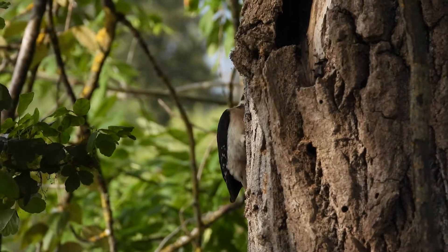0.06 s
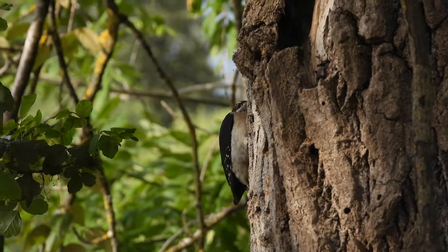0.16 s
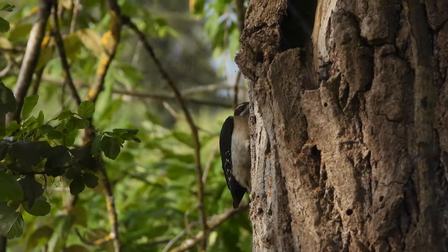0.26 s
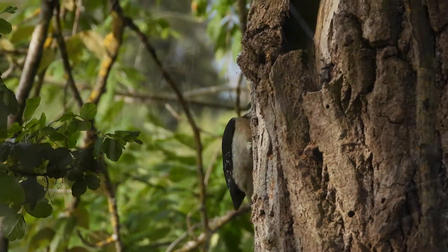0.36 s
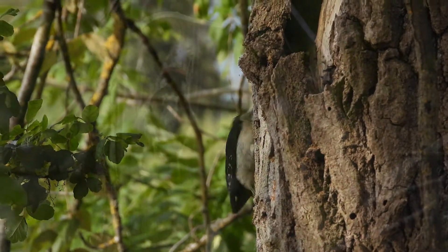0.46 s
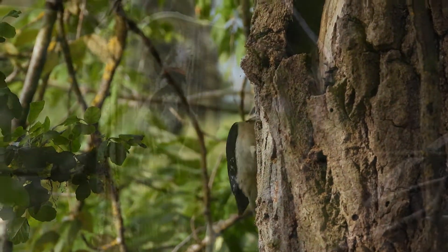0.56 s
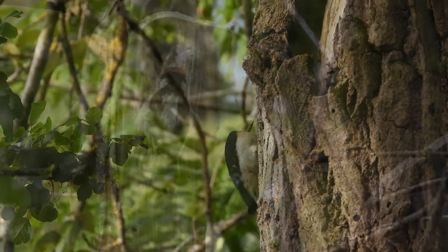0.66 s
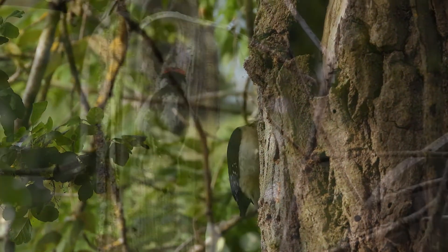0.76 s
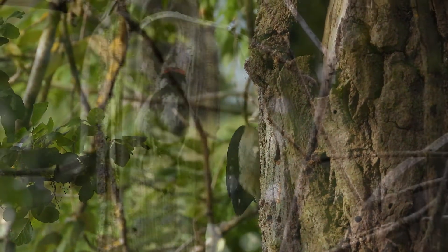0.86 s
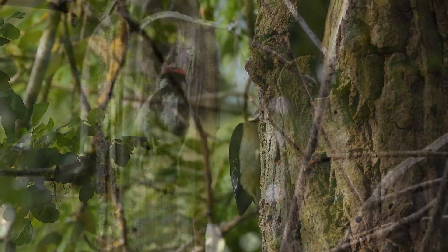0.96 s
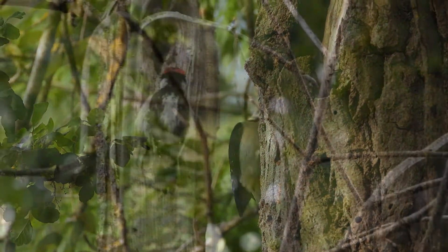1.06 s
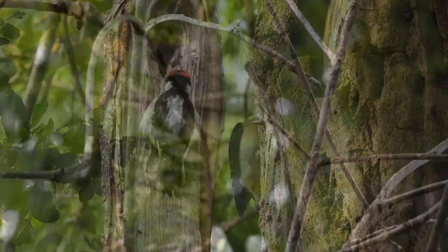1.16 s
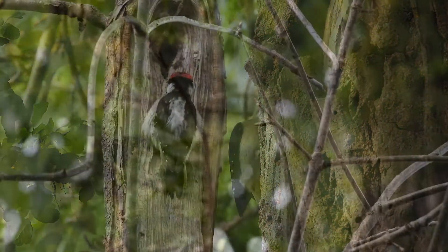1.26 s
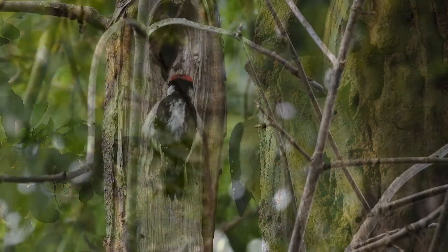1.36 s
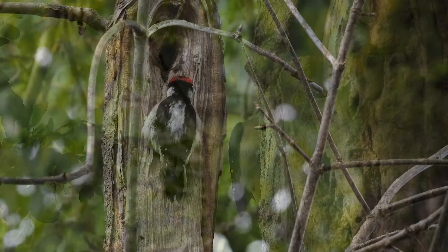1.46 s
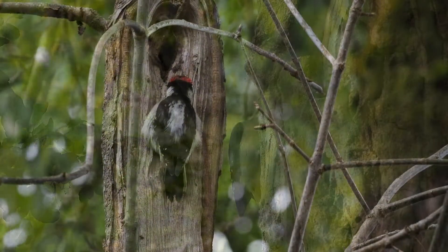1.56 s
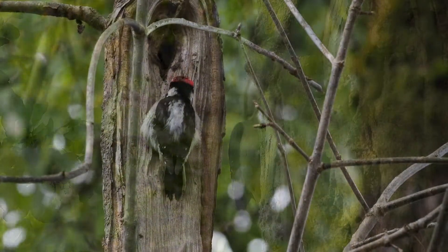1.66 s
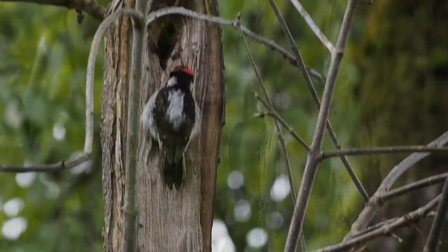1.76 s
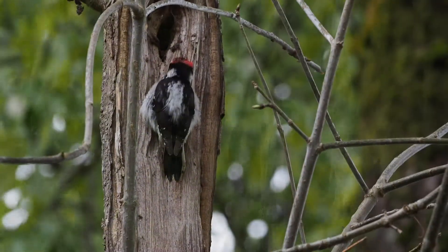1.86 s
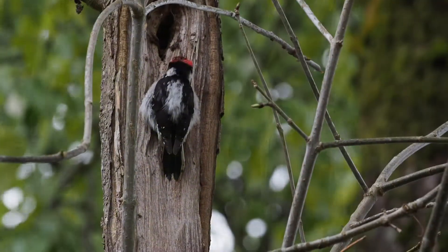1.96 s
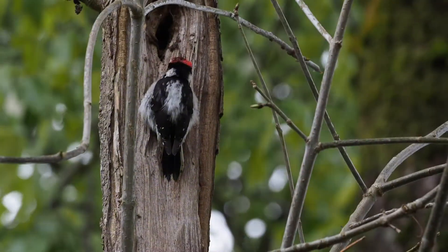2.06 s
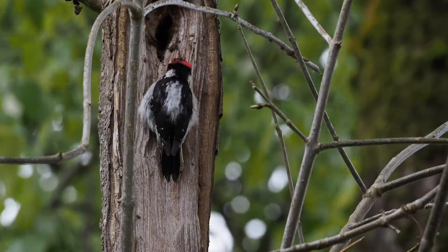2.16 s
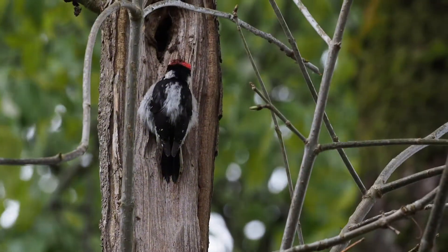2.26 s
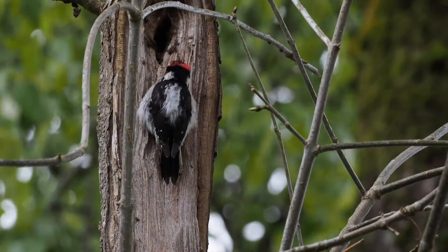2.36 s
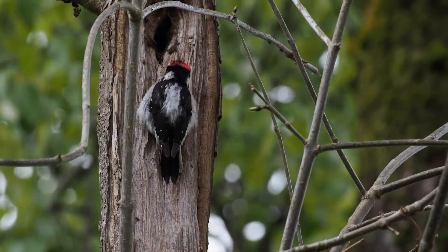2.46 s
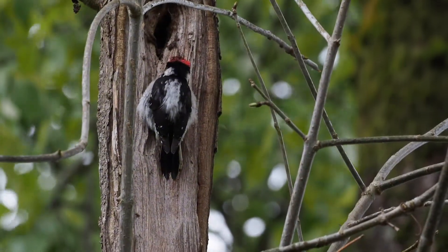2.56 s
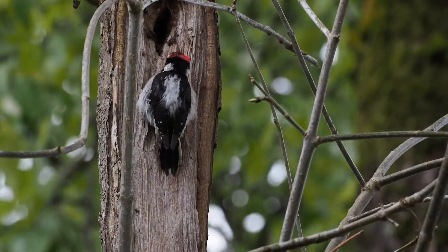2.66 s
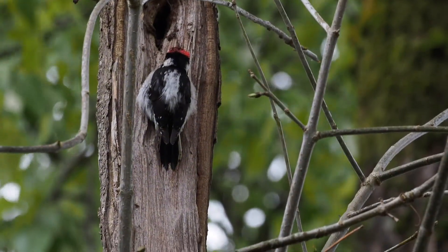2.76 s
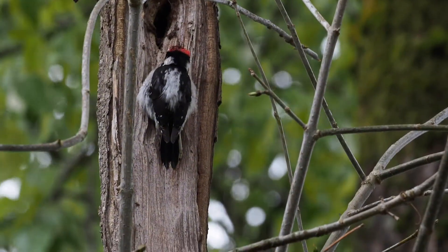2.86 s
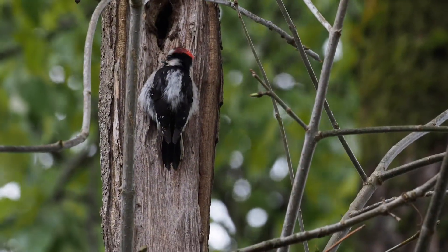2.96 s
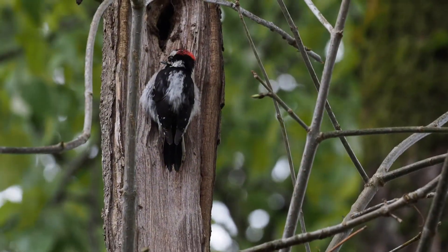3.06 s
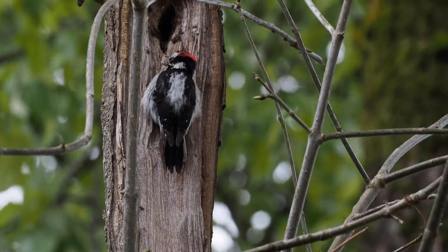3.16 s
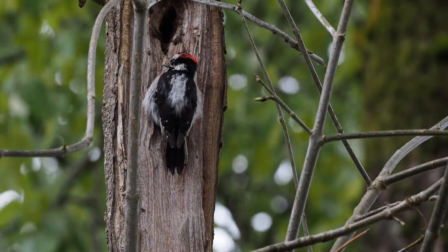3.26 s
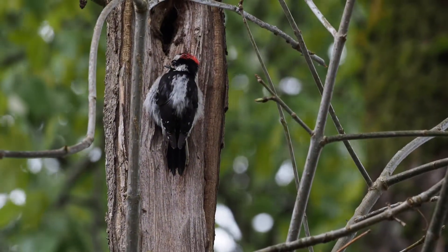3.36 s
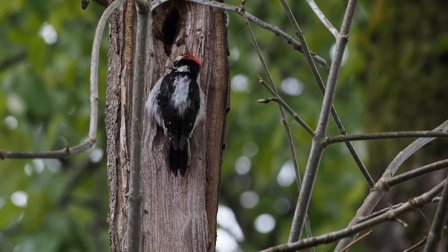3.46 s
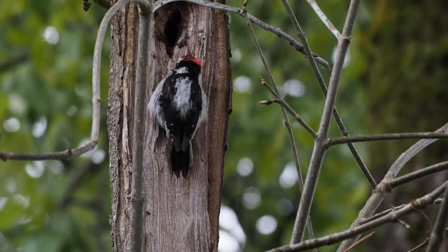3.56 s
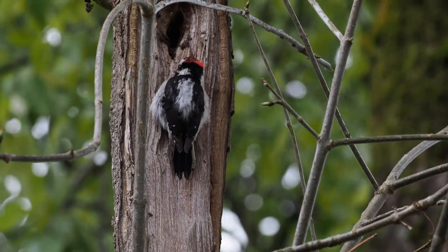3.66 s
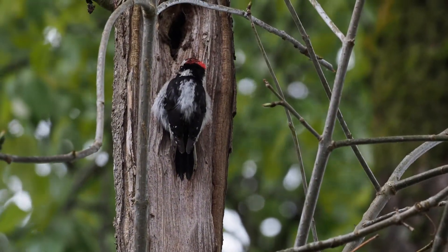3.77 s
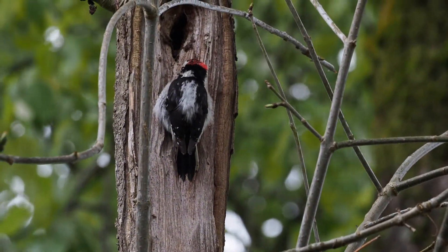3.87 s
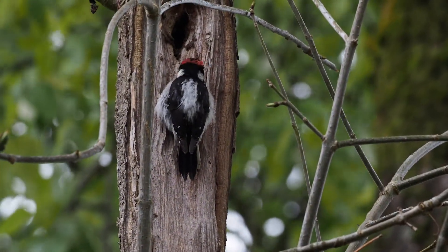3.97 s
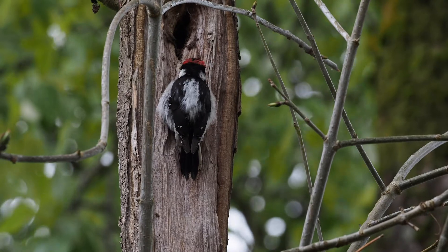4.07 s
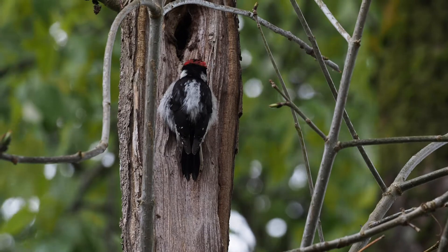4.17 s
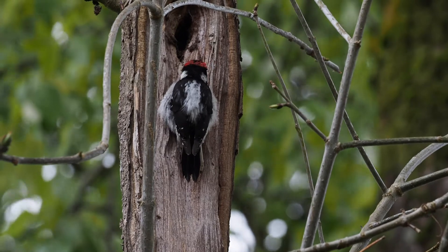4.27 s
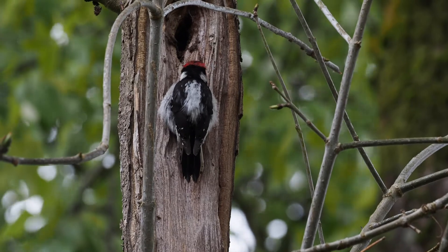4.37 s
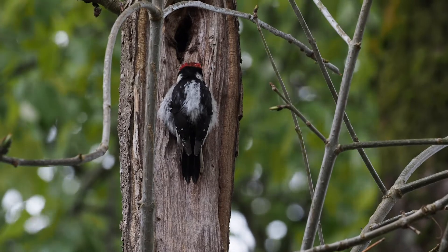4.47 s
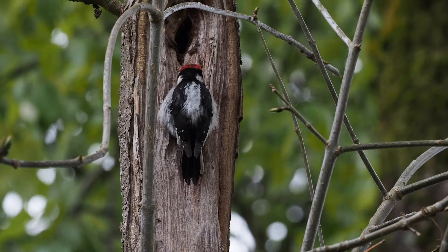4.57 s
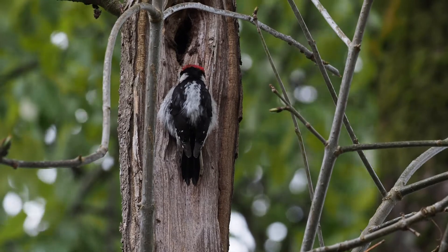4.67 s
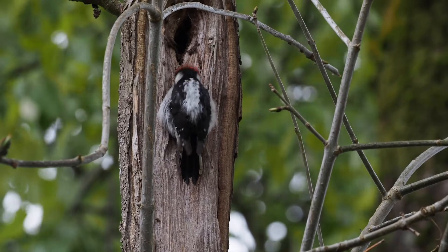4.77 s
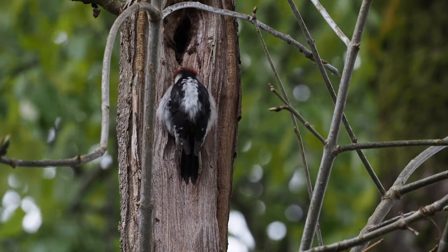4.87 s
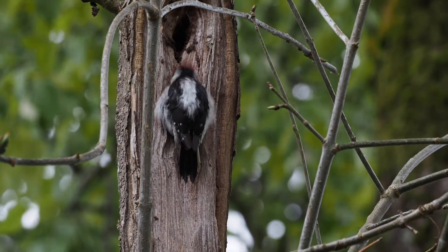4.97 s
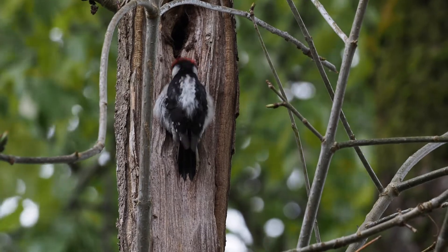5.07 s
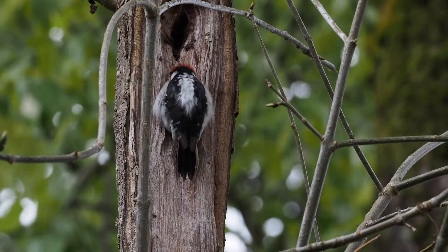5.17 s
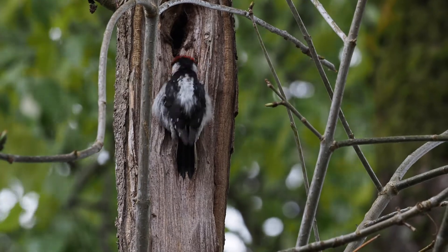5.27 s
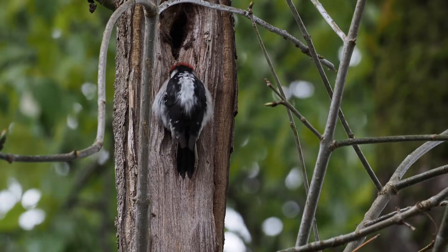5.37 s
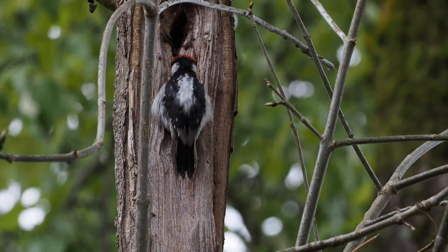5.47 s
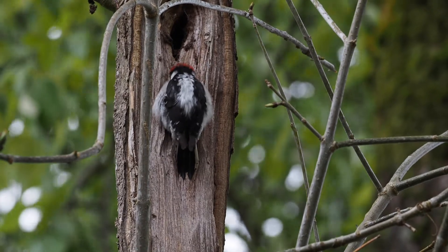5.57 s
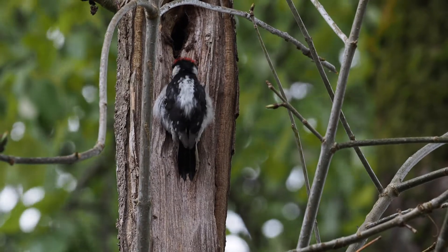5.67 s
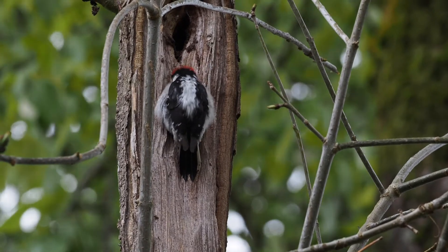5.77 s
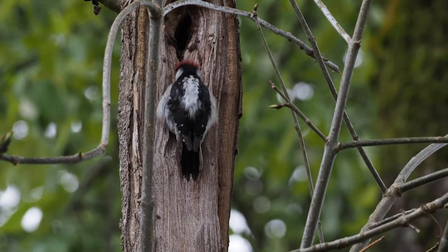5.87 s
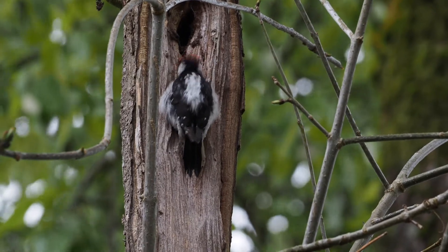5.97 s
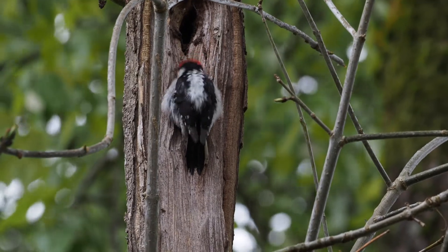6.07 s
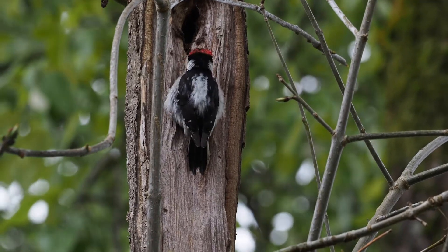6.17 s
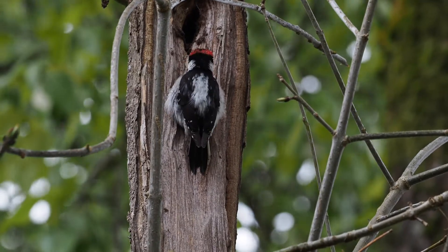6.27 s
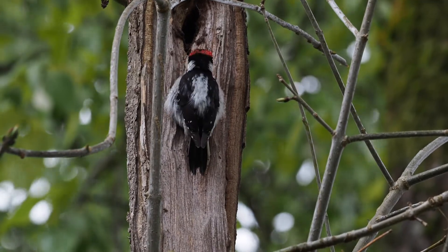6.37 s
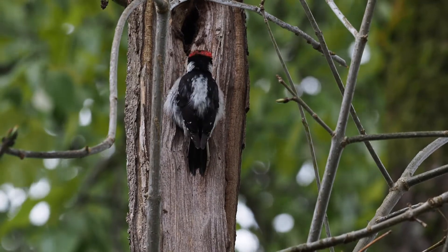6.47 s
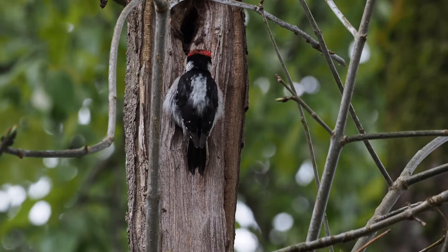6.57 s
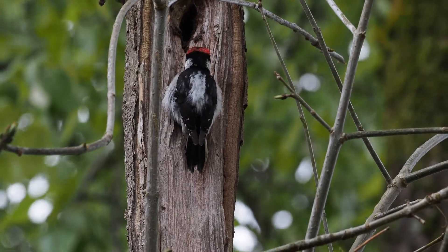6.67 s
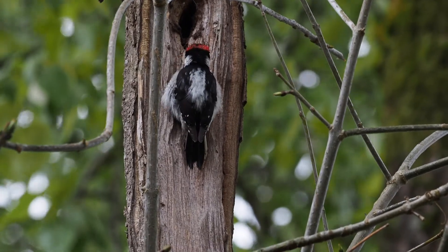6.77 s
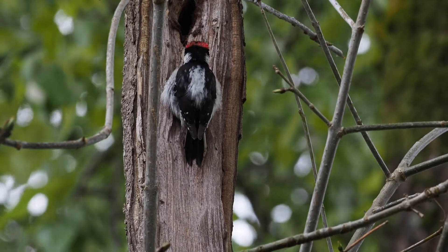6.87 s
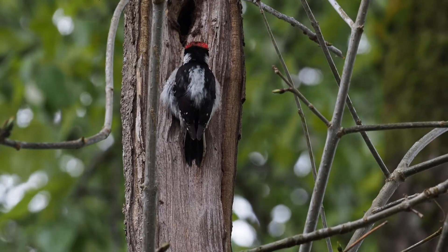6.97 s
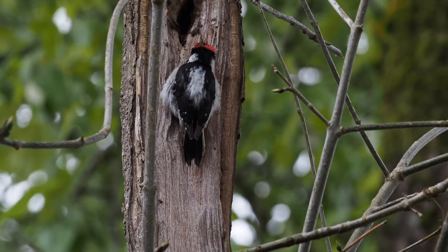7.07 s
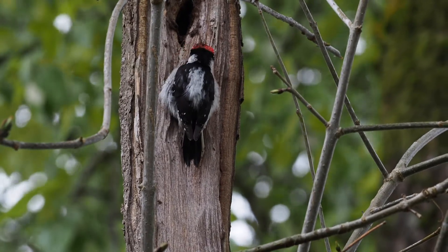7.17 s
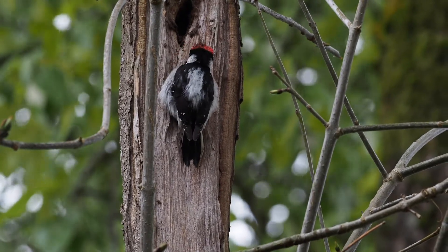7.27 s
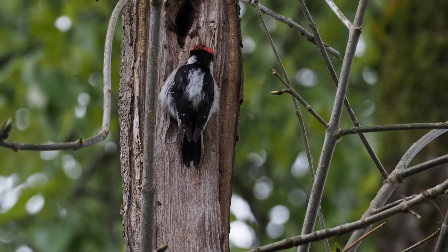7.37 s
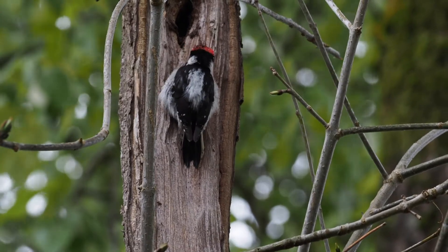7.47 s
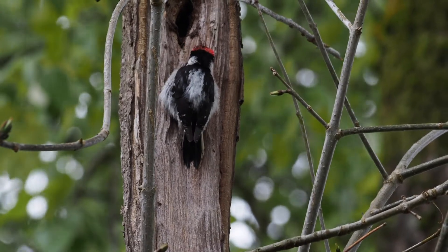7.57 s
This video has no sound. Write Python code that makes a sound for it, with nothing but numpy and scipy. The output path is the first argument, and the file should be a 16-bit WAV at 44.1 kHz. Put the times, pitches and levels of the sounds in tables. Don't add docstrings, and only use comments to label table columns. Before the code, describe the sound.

A hushed grove with a small croak, evenly spaced chips and two soft pecks fades to a brief silence. A fuller forest starts abruptly: leaf hiss, low distant traffic and a warbler whistling quickly on the left. Then a woodpecker drums one loud, hollow roll of about twenty blows, slowing slightly, with echoes from surrounding trees. Small birds carry on afterwards. Stereo, outdoors, drumming clear and dominant.

```python
import sys
import numpy as np
from scipy import signal
from scipy.fft import rfft, irfft, next_fast_len
from scipy.io import wavfile
from scipy.ndimage import uniform_filter1d, map_coordinates

SR = 44100
rng = np.random.default_rng(int(sys.argv[2]) if len(sys.argv) > 2 else 0)


def master(y):
    cut = np.clip(np.atleast_2d(y).T, -1, 1)
    pcm = np.round(cut * 32767)
    wavfile.write(sys.argv[1], SR, pcm.astype(np.int16))


def volts(x):
    e = np.asarray(x, float) / 20
    return 10 ** e


N = 336483
GROVE_END_S, CUT_S = 1.068, 1.2315
SIDES = np.array([[.5], [-.5]])


def unit(x):
    return x / np.sqrt(np.mean(x ** 2) + 1e-20)


def along(points, hz):
    f, v = np.transpose(points)
    return np.interp(np.log(hz + 1), np.log(f + 1), v)


def curves(rows):
    s, *columns = np.transpose(rows)
    return [np.interp(np.arange(N) / SR, s, column) for column in columns]


def wobble(rate):
    knots = rng.standard_normal(int(N * rate / SR) + 4)
    return map_coordinates(knots, [np.arange(N) * rate / SR])


def add(mix, s, sound):
    part = mix[:, round(s * SR):][:, :sound.shape[1]]
    part += sound[:, :part.shape[1]]


def late_left(x, count):
    return np.array([np.roll(x[0], count), x[1]])


def reverb(x, alike, size_share=1):
    # (frequency [Hz], time to fall by 60 dB [s])
    wood = [(300, 0.19), (1000, 0.93), (3000, 1), (8000, 0.545)]
    hz, t, z = signal.stft(rng.standard_normal((2, SR)), SR, nperseg=256)
    z = z / np.abs(z + 1e-9) ** .7
    t60 = size_share * along(wood, hz)[:, None]
    a, b = signal.istft(z * volts(-60 * t / t60), SR, nperseg=256)[1]
    tail = np.array([a + alike * b, b + alike * a])
    late = np.pad(x, ((0, 0), (400, 0)))
    return signal.fftconvolve(late, tail / np.linalg.norm(tail[0]), axes=1)[:, :N]


def ring(modes, t, attack, scatter_db):
    total = 0
    for k, (hz, db, t60) in enumerate(modes):
        fading = volts(db + rng.normal(0, scatter_db) - 60 * t / t60)
        total = total + (-1) ** k * fading * np.sin(2 * np.pi * hz * t)
    return (1 - np.exp(-t / attack)) ** 2 * total


def drumming():
    # (time [s], peak level [dB])
    blows = [(4.796, -12.5), (4.855, -8), (4.912, -7), (4.97, -7), (5.03, -6.5), (5.09, -6.5),
             (5.151, -6.5), (5.214, -7), (5.278, -7), (5.344, -7.5), (5.412, -6.5), (5.479, -7.5),
             (5.546, -7), (5.613, -7), (5.678, -7), (5.744, -7.5), (5.815, -7.5), (5.885, -7.5),
             (5.963, -8), (6.037, -8), (6.122, -10)]
    # (frequency [Hz], level [dB], t60 [s])
    trunk = [(796, -14.5, .021), (991, 0, .02), (1091, -.1, .021)]
    # (frequency [Hz], level [dB], t60 [s])
    bending = [(1285, -12, 0.01111), (1530, -16, 0.01005)]
    # (frequency [Hz], level [dB], t60 [s])
    bark = [(576, -22, 0.025), (1973, -3.5, 0.00965), (2254, 1.5, 0.00846), (2445, -14, 0.01036),
            (2700, -12, 0.01566), (2941, -15.5, 0.01306), (3200, -12, 0.01002), (3500, -25, 0.0045)]
    # (frequency [Hz], level [dB], t60 [s])
    skin = [(3650, -18, 0.01297), (4160, -17.5, 0.0094), (4930, -21.5, 0.0057), (5500, -21.5, 0.0075),
            (6540, -26.5, 0.0036), (7480, -24.5, 0.0066)]
    # (delay [s], left level [dB], right level [dB])
    trees = [(.0085, -10.5, -14.5), (0.014, -20.5, -21.5), (0.024, -20, -18), (0.0387, -24, -20.5),
             (0.052, -33, -39), (0.076, -25, -27), (.110, -26, -26), (0.126, -32, -31.5),
             (.203, -27, -27.5), (0.277, -34, -35.5), (.362, -25, -24)]
    # (delay [s], level [dB])
    smooth_trunks = [(.011, -12.5), (.016, -17), (0.025, -15), (.032, -10.5), (.047, -20.5)]
    # (delay [s], level [dB])
    slim_delay, slim_db = (0.027, -8)

    boom, crack, snap, shoulder, late = np.zeros((5, 1, N))
    t = np.arange(SR // 8) / SR
    u = np.arange(round(.013 * SR)) / round(.013 * SR)
    slump_hz = 716.4 * (492.2 / 716.4) ** u
    slump = np.sin(np.pi * u) * np.sin(2 * np.pi * np.cumsum(slump_hz) / SR)
    splinter_band = signal.butter(2, [7800, 10800], "band", fs=SR, output="sos")
    usual_db = np.mean(blows, axis=0)[1]
    for s, db in blows:
        sharp_db = db - 14 + .2 * (db - usual_db) + .63 * rng.standard_normal()
        hollow = ring(trunk, t, attack=.004, scatter_db=.25)
        bends = ring(bending, t, attack=.00366, scatter_db=.37)
        dull = ring(bark, t, attack=.001892, scatter_db=1.13)
        bright = ring(skin, t, attack=.0004, scatter_db=2.18)
        add(boom, s - .0021, volts(db + 13) * hollow[None])
        add(late, s + .003253, volts(db - 25.5) * slump[None])
        add(shoulder, s - .0021, -volts(db + 13) * bends[None])
        add(crack, s - .0015, volts(sharp_db + 11) * dull[None])
        add(snap, s - .0007, volts(sharp_db) * bright[None])
        fibres = np.exp(-np.abs(t - .004) / .0014) * rng.standard_normal(len(t))
        add(snap, s - .0037, volts(db - 43.5) * signal.sosfilt(splinter_band, fibres)[None])

    boom = boom + shoulder
    sharp = crack + snap
    rough = boom + volts(-11) * sharp
    no_bass = signal.butter(2, 250, "high", fs=SR, output="sos")
    direct, answer = signal.sosfilt(no_bass, np.array([boom + sharp + late, rough]))
    short_waves = np.gradient(np.gradient(sharp, axis=1), axis=1)
    scattered = volts(-14.5) * boom + volts(-4) * shoulder + volts(12.5) * uniform_filter1d(short_waves, size=5)
    wet = direct * volts(SIDES * -1.6) + reverb(scattered, alike=.093)
    for delay, db in smooth_trunks:
        add(wet, delay, volts(db + 9.5) * np.gradient(crack, axis=1))
    add(wet, slim_delay, volts(slim_db) * shoulder)
    for delay, left_db, right_db in trees:
        add(wet, delay, answer * volts(np.array([[left_db], [right_db]])))
    return late_left(wet, count=1)


def glides(notes, flutter_db):
    out = np.zeros((2, N))
    for s, length, from_hz, to_hz, db, pan_db in notes:
        u = np.arange(round(length * SR)) / round(length * SR)
        way = u - .75 * np.sin(2 * np.pi * u) / (2 * np.pi)
        tone = np.sin(2 * np.pi * np.cumsum(from_hz * (to_hz / from_hz) ** way) / SR)
        add(out, s, volts(db + 3.5 + SIDES * pan_db) * np.sin(np.pi * u) ** .52 * tone)
    return out * volts(flutter_db * np.array([wobble(130), wobble(130)]))


def songs():
    # (time [s], from [Hz], to [Hz], level [dB])
    falls = [(1.225, 4752, 2834, -61), (1.418, 4000, 3240, -52.5), (1.685, 3800, 2930, -47.5),
             (1.827, 4570, 3660, -55), (2.403, 3809, 2813, -43), (2.752, 3902, 2835, -44.5),
             (3.165, 4951, 3555, -48.5)]
    # (time [s], from [Hz], to [Hz], level [dB])
    rises = [(1.659, 2380, 2980, -53), (1.708, 2910, 3942, -51), (1.97, 3100, 3350, -50),
             (2.071, 3930, 4300, -56.5), (5.452, 2990, 3433, -49.5)]
    # (time [s], length [s], pitch [Hz], level [dB])
    holds = [(1.537, 0.043, 4520, -60.5), (1.863, 0.049, 4210, -59), (5.224, 0.071, 4008, -63.5),
             (6.542, 0.038, 5440, -62.5)]
    # (time [s], length [s], from [Hz], to [Hz], level [dB])
    bent_notes = [(1.663, 0.0306, 3890, 3788, -54), (1.846, 0.0173, 3690, 4130, -49.5),
                  (2.136, 0.078, 2800, 3500, -48), (2.156, 0.054, 3220, 2852, -41),
                  (2.084, 0.046, 4300, 4428, -62.5), (2.879, 0.0523, 3060, 2863, -45.5),
                  (1.975, 0.0314, 4080, 3045, -42.5), (2.002, 0.015, 3538, 3200, -49),
                  (2.213, 0.0343, 3480, 2758, -38), (2.362, 0.065, 3778, 3830, -55),
                  (2.608, 0.0282, 2668, 3005, -45.5), (2.531, .042, 3700, 2498, -47),
                  (2.694, 0.0294, 3550, 3026, -43), (2.723, 0.0295, 3370, 4007, -52),
                  (2.948, 0.0466, 2700, 2181, -55), (2.84, 0.031, 5000, 4830, -72),
                  (3.059, 0.0216, 4340, 4060, -61.5), (3.227, 0.081, 3650, 3835, -56.5),
                  (3.323, 0.0354, 4550, 4000, -55.5), (3.409, 0.04, 3620, 2736, -44),
                  (3.444, 0.0217, 2770, 2490, -53), (3.552, 0.019, 2965, 2540, -50),
                  (4.128, 0.0354, 3040, 2480, -58.5), (3.135, 0.037, 5220, 5110, -68.5),
                  (3.35, 0.0454, 4060, 3710, -53), (3.498, 0.0663, 3163, 2886, -52.5),
                  (3.581, 0.017, 2643, 3285, -46), (3.599, 0.044, 3050, 3087, -63)]
    # (time [s], level [dB])
    churrs = [(3.667, -51), (3.775, -49), (3.888, -49), (3.991, -51), (4.102, -52)]
    # (time after its start [s], length [s], from [Hz], to [Hz], level [dB])
    churr_parts = [
        (0, 0.01634, 4660, 3510, -15),
        (0.01, .02, 3500, 3049, 1),
        (0.025, 0.0176, 3300, 2700, 0),
        (.04, .016, 2672, 2476, -3),
    ]
    # (time [s], length [s], from [Hz], to [Hz], level [dB])
    ahead = [(1.38, 0.022, 4950, 3800, -59), (2.2, 0.058, 5410, 4760, -61),
             (2.115, 0.047, 4350, 3500, -53.5), (6.9, 0.04, 3400, 2770, -59.5),
             (3.195, 0.033, 4000, 3600, -52), (3.642, 0.065, 2560, 2503, -52.5),
             (3.5, 0.027, 4500, 5700, -54.5), (6.1, 0.033, 4750, 4240, -61), (6.14, 0.061, 4500, 4070, -63),
             (7.28, .07, 3150, 2800, -62), (7.41, 0.119, 3150, 3050, -60.5), (6.52, .06, 2700, 3100, -62.5),
             (6.772, 0.029, 3550, 3700, -59.5), (6.58, 0.025, 3800, 3840, -63), (4, .07, 7400, 6300, -65.5),
             (5.358, 0.073, 4680, 3770, -55), (6.5, 0.039, 4360, 3046, -52.5),
             (6.5, 0.041, 3200, 2403, -56.5), (7.585, 0.0286, 7690, 7250, -62.5)]
    # (time [s], from [Hz], to [Hz], level [dB])
    slides = [(6.017, 2620, 2415, -47.5), (6.291, 2660, 2360, -52.5), (6.574, 2372, 2439, -51.5),
              (6.724, 2650, 2410, -52.5), (6.76, 2656, 2430, -58.5), (6.928, 2639, 2274, -52.5),
              (7.068, 2539, 2279, -53), (7.195, 2325, 2407, -58.5), (7.485, 2278, 2374, -56),
              (7.571, 2305, 2422, -50.5)]
    # (time [s], from [Hz], to [Hz], level [dB])
    flips = [
        (6.484, 3013, 3200, -54),
        (7.265, 2890, 3200, -53),
        (7.385, 2700, 3153, -53),
    ]
    # (time [s], length [s], from [Hz], to [Hz], level [dB])
    faint = [(4.358, 0.0278, 5460, 5400, -64), (4.5, .085, 5420, 5500, -67.5),
             (4.58, 0.039, 5500, 6810, -68.5), (4.613, 0.057, 6980, 6540, -66.5),
             (4.702, 0.18, 7530, 7600, -76), (6.605, 0.046, 5860, 6130, -65.5),
             (7.51, 0.098, 6084, 6153, -69)]
    warbler_pan_db, ahead_pan_db, low_pan_db, thin_pan_db = 9.5, 2.5, -9.5, -8.5
    flip_s = .018

    warbler = list(bent_notes)
    for s, a, b, db in falls:
        length = .01567 + (a - b) / 36000 * (4000 / a) ** 2.357
        warbler.append((s, length, a, b, db))
    warbler += [(s, .036, a, b, db) for s, a, b, db in rises]
    warbler += [(s, length, hz, hz - 2500 * length, db) for s, length, hz, db in holds]
    low = [(s, .0406, a, b, db) for s, a, b, db in slides]
    for s, a, b, db in flips:
        low.append((s, flip_s, a, b, db))
        low.append((s + flip_s * .75, flip_s, b, b * .82, db - .5))
    hoarse = [(s + after, length, a, b, db + part_db, warbler_pan_db)
              for s, db in churrs for after, length, a, b, part_db in churr_parts]
    singers = [(warbler, warbler_pan_db), (low, low_pan_db), (faint, thin_pan_db)]
    placed = [note + (pan_db,) for notes, pan_db in singers for note in notes]
    centre = glides([note + (ahead_pan_db,) for note in ahead], flutter_db=1.08)
    centre = late_left(centre, count=-5)
    return centre + glides(placed, flutter_db=2.66) + glides(hoarse, flutter_db=3.5)


def long_whistle():
    # (time [s], from [Hz], to [Hz], level [dB])
    breaths = [(4.811, 5580, 5790, -51.5), (4.975, 5800, 5750, -62), (5.039, 5860, 5968, -54.5),
               (5.27, 6275, 6480, -56), (5.445, 6730, 6526, -54.5), (5.599, 6850, 6620, -55.5),
               (5.788, 6920, 6683, -59.5), (5.92, 6856, 6840, -75.5)]
    scoop_s = .039
    points = []
    for (s, from_hz, to_hz, db), after in zip(breaths, breaths[1:]):
        points.append((s, from_hz - 250, db - 9.5))
        points.append((s + scoop_s, from_hz, db))
        points.append((after[0] - scoop_s / 2, to_hz, db - 10.5))
    end_s, end_hz, _, end_db = breaths[-1]
    hz, db = curves(points + [(end_s, end_hz, end_db)])
    t = np.arange(N) / SR
    on = (t > breaths[0][0]) & (t < end_s)
    shaky_hz = (30 + 60 * (t > 5.3)) * wobble(60)
    tone = np.sin(2 * np.pi * np.cumsum(hz + shaky_hz) / SR)
    return on * volts(db + 4.5 + 2.6 * wobble(50) + SIDES * -9) * tone


def pulsed(calls, rate, sweep_hz, sharp, uneven_db, pan_db):
    out = np.zeros((2, N))
    for s, length, from_hz, to_hz, db in calls:
        u = np.arange(round(length * SR)) / round(length * SR)
        turns = u * length * rate
        size = volts(uneven_db * rng.standard_normal(100))[turns.astype(int)]
        hz = from_hz + (to_hz - from_hz) * u + sweep_hz * (.5 - turns % 1)
        beats = size * np.abs(np.sin(np.pi * turns)) ** (2 * sharp)
        pulses = beats * np.sin(2 * np.pi * np.cumsum(hz) / SR)
        add(out, s, volts(db + 6.5 + SIDES * pan_db) * np.sin(np.pi * u) ** .37 * pulses)
    return out


def birds():
    # (time [s], length [s], from [Hz], to [Hz], level [dB])
    trill = [
        (5.544, 0.32, 4905, 5002, -57),
    ]
    # (time [s], length [s], from [Hz], to [Hz], level [dB])
    trill_start = [
        (5.424, .054, 4457, 4923, -54.5),
        (5.477, .067, 4874, 4930, -52),
    ]
    # (time [s], length [s], from [Hz], to [Hz], level [dB])
    buzz = [(4.34, 0.188, 3307, 3546, -63), (4.39, 0.121, 3090, 2911, -64.5),
            (4.45, 0.147, 3662, 3950, -62.5), (4.51, .15, 4160, 4300, -65.5),
            (4.54, 0.117, 3362, 3582, -63)]
    # (time [s], from [Hz], level [dB])
    chatter = [(6.58, 4100, -58.5), (6.68, 4250, -65), (6.76, 3980, -58), (6.89, 4090, -59),
               (6.99, 4150, -75)]
    # (time [s], length [s], from [Hz], to [Hz], level [dB])
    croak = [(.09, 0.051, 2157, 2046, -86), (.12, 0.088, 1850, 1705, -73.5),
             (.175, 0.0258, 1910, 1932, -62.5), (.2, 0.035, 1862, 1794, -74.5), (.24, .09, 1900, 1784, -86),
             (.33, 0.032, 1680, 1654, -71.5)]
    # (time [s], level [dB])
    chips = [(.392, -55), (0.504, -57.5), (.619, -59), (.734, -59.5), (.845, -72.5), (.955, -85),
             (1.025, -93.5)]
    # (time [s], length [s], from [Hz], to [Hz], level [dB])
    high_chip = [
        (.73, .03, 4460, 3810, -59),
    ]
    # (time [s], length [s], from [Hz], to [Hz], level [dB])
    hoots = [
        (0.136, 0.0354, 390, 370, -72),
        (0.429, 0.043, 716, 658, -67.5),
        (.6, 0.051, 259.4, 239, -72),
    ]

    far = pulsed(trill, rate=67, sweep_hz=800, sharp=.45, uneven_db=1.2, pan_db=-11)
    far += pulsed(trill_start, rate=75, sweep_hz=850, sharp=.45, uneven_db=.8, pan_db=-11)
    far += volts(-1.5) * (songs() + long_whistle())
    far += volts(5) * pulsed(buzz, rate=140, sweep_hz=250, sharp=.97, uneven_db=1.5, pan_db=11)
    chatter = [(s, .096, hz, 4300, db) for s, hz, db in chatter]
    far += volts(.5) * pulsed(chatter, rate=96, sweep_hz=-1400, sharp=.43, uneven_db=3.5, pan_db=-1)
    small = [(s, .0251, 3489, 3350, db) for s, db in chips] + high_chip + hoots
    near = volts(-6) * glides([note + (-11,) for note in small], flutter_db=3.5)
    near += volts(.5) * pulsed(croak, rate=140, sweep_hz=350, sharp=.52, uneven_db=5, pan_db=9.5)
    far_tail = volts(-3.5) * reverb(far.mean(0)[None], alike=-.11)
    leaves = volts(-17) * reverb(far, alike=.13, size_share=.033)
    near_tail = volts(-10) * reverb(near, alike=.1, size_share=.29)
    return volts(.04) * late_left(far + leaves, count=5) + far_tail + near + near_tail


def taps():
    # (time [s], level [dB], tones as (frequency [Hz], level [dB]))
    pecks = [
        (0.668, -56, [(250, -7.5), (330, 1), (450, 4), (560, 0), (2000, -22), (3900, -16), (4900, -26.5), (5350, -11), (5850, -14.5), (7000, -30), (9000, -23.5), (10800, -24)]),
        (0.896, -57.5, [(170, -6), (240, -1), (340, 1), (500, -2.5), (1400, -8.5), (2450, -8.5), (3500, -24), (5000, -21), (5700, -10), (6450, -10), (7300, -19.5), (10000, -24.5)]),
    ]
    # (time [s], level [dB], pitch [Hz], left minus right [dB])
    ticks = [(2.39, -65, 6950, 3.5), (2.677, -46.5, 5500, -13), (3.40, -49.5, 6070, -8.5),
             (3.759, -47, 5500, -12), (3.89, -53, 7160, 12.5), (6.525, -56, 7550, 11)]
    out, t = np.zeros((2, N)), np.arange(SR // 10) / SR
    for s, db, peaks in pecks:
        modes = []
        for hz, level in peaks:
            t60 = .0737 * (500 / hz) ** .102
            for step in (.9, .94, .98, 1.02, 1.06, 1.1):
                modes.append((hz * step * rng.normal(1, .0182), level - .6, t60))
        add(out, s, volts(db + SIDES * -3) * ring(modes, t, attack=.00096, scatter_db=2))
    for s, db, hz, pan_db in ticks:
        modes = [(hz * rng.normal(1, .15), -16, .025) for _ in range(50)]
        add(out, s, volts(db + SIDES * pan_db) * ring(modes, t, attack=.0018, scatter_db=3))
    return out + volts(-2) * reverb(out, alike=.33, size_share=.059)


def rush(spectrum, alike, patchy_db):
    # (frequency [Hz], left minus right [dB])
    lean = [(60, -2.5), (240, 1), (950, -2.5), (3770, 1), (15000, 0.5)]
    z = signal.stft(rng.standard_normal((2, N)), nperseg=512)[2]
    field = uniform_filter1d(rng.standard_normal(z.shape[1:]), size=6, axis=0)
    field = uniform_filter1d(field, size=14, axis=1)
    pair = signal.istft(z * volts(patchy_db * unit(field)), nperseg=512)[1][:, :N]
    m = next_fast_len(N)
    hz = np.fft.rfftfreq(m, 1 / SR)
    turn = np.arccos(np.clip(along(alike, hz), -1, 1)) / 2
    mid, side = rfft(pair, m) * volts(along(spectrum, hz)) * [np.cos(turn), np.sin(turn)]
    both = np.array([mid + side, mid - side]) * volts(SIDES * along(lean, hz))
    return unit(irfft(both, m)[:, :N])


def background():
    # (frequency [Hz], level [dB per Hz])
    grove_air = [(60, -60), (130, -27.5), (210, -7.5), (400, -18.5), (700, -10), (1080, -11.5),
                 (1570, -20.5), (3700, -35), (4260, -23), (4700, -29.5), (5600, -32.5), (7500, -40.5),
                 (11500, -43), (15600, -57.5)]
    # (frequency [Hz], level [dB per Hz])
    grove_fizz = [(6500, -120), (7500, -13.5), (9000, -1.5), (11000, 4), (11900, -4), (12300, -120)]
    # (frequency [Hz], likeness [0..1])
    grove_alike = [(60, 0.9), (240, 0.98), (950, 0.914), (3770, 0.23), (15000, -0.0)]
    # (frequency [Hz], level [dB per Hz])
    traffic = [(15, -77), (30, -49), (112, -21.5), (147, -14), (189, -11), (252, -3), (489, -6),
               (694, -2.5), (876, -4), (984, -1), (1240, -5.5), (1830, -17), (2600, -26.5), (3380, -32.5),
               (5720, -120)]
    # (frequency [Hz], level [dB per Hz])
    hiss = [(1060, -22.5), (1800, -24.5), (2120, -3.5), (2430, 0.5), (3540, -6.5), (4480, -11.5),
            (4910, -14.5), (5990, -18), (6440, -16.5), (8210, -22), (10300, -22), (11200, -27.5),
            (13000, -20.5), (15600, -27)]
    # (frequency [Hz], likeness [0..1])
    forest_alike = [(60, 0.82), (150, 1), (380, 0.867), (950, 0.834), (1600, 1), (3100, 0.18), (6000, .12),
                    (15000, .02)]
    # (time [s], level [dB])
    breeze = [(1.23, 0), (2.7, 2), (4.5, 0.5), (5.5, 2), (6.4, -0.5), (7.63, 0.5)]
    # (time [s], half width [s], level [dB])
    drone = [(1.25, 0.177, -49.5), (2.15, 0.424, -50.5), (3.5, 0.118, -53), (4.05, 0.307, -52)]
    # (frequency [Hz], level [dB per Hz])
    wind = [(20, -11), (50, -13), (85, 10.5), (130, -6.5), (300, -52)]
    # (frequency [Hz], level [dB])
    whine = [(6589, -80.5), (13184, -97)]

    t = np.arange(N) / SR
    fade = np.cos(np.pi / 2 * np.clip(t / GROVE_END_S, 0, 1))
    grove = volts(-73) * rush(grove_air, grove_alike, patchy_db=1.62)
    grove += volts(-89) * rush(grove_fizz, grove_alike, patchy_db=5)
    traffic_db = -42.5 - .1544 * t + .18 * wobble(2.972)
    forest = volts(traffic_db) * rush(traffic, forest_alike, patchy_db=.1571)
    forest += volts(-56.5 + curves(breeze)[0]) * rush(hiss, forest_alike, patchy_db=1)
    swells = volts(-65) + sum(volts(db) * np.exp(-((t - s) / width) ** 2) for s, width, db in drone)
    engine = np.sin(2 * np.pi * np.cumsum(254 + 1.53 * wobble(4)) / SR)
    forest += swells * volts(2.3 * wobble(8)) * engine
    forest += volts(-76.5 + 2.5 * wobble(3.2)) * rush(wind, [(50, .1)], patchy_db=4.5)
    whines = sum(volts(db) * np.sin(2 * np.pi * hz * t) for hz, db in whine)
    forest += whines * np.array([[1.4], [.6]])
    return fade * grove + (t > CUT_S) * late_left(forest, count=6)


def thin_treble(x):
    # (from [s], to [s])
    thin_times = [(4.78, 4.8), (4.86, 4.91), (4.975, 5.085), (5.155, 5.21), (5.262, 5.275), (5.33, 5.342),
                  (5.55, 5.565), (5.62, 5.675), (5.73, 5.742), (5.8, 5.812), (5.868, 5.884), (6.1, 6.14)]
    # (from [Hz], to [Hz])
    weak_bands = [
        (10800, 11700),
        (14900, 16000),
    ]
    hz, t, z = signal.stft(x, SR, nperseg=256)
    lost = rng.random((len(hz) // 3 + 1, len(t) // 4 + 1)) < .4
    lost = lost.repeat(3, axis=0).repeat(4, axis=1)[:len(hz), :len(t)]
    weak = sum((hz > a) & (hz < b) for a, b in weak_bands).astype(bool)
    lost = lost | weak[:, None]
    thin = sum((t > a) & (t < b) for a, b in thin_times) * (hz > 7800)[:, None]
    gain = 1 + thin * (.3 - 1.3 * lost)
    return signal.istft(z * gain, SR, nperseg=256)[1][:, :N]


def scene():
    t = np.arange(N) / SR
    heard = (t < GROVE_END_S) | (t > CUT_S)
    return heard * (drumming() + birds() + taps() + background())


def low_pass(x):
    return signal.sosfilt(signal.butter(12, 15750, fs=SR, output="sos"), x)


def record(dry):
    band_limit = signal.ellip(10, .5, 60, 15700, fs=SR, output="sos")
    mix = signal.sosfilt(band_limit, thin_treble(dry))
    return low_pass(mix)


dry = scene()
out = record(dry)
master(out)
```